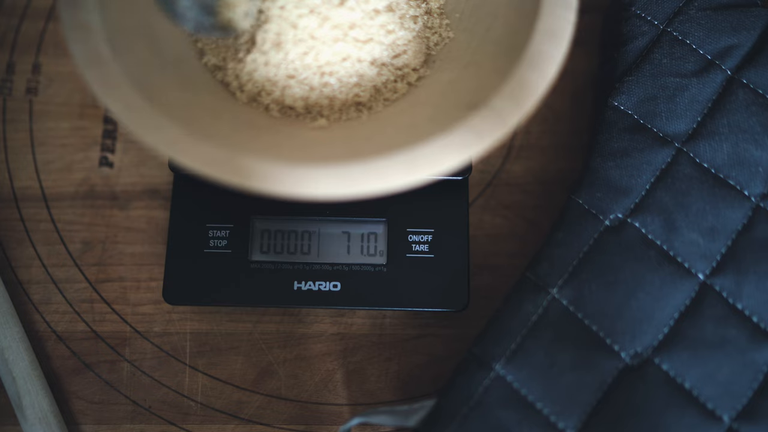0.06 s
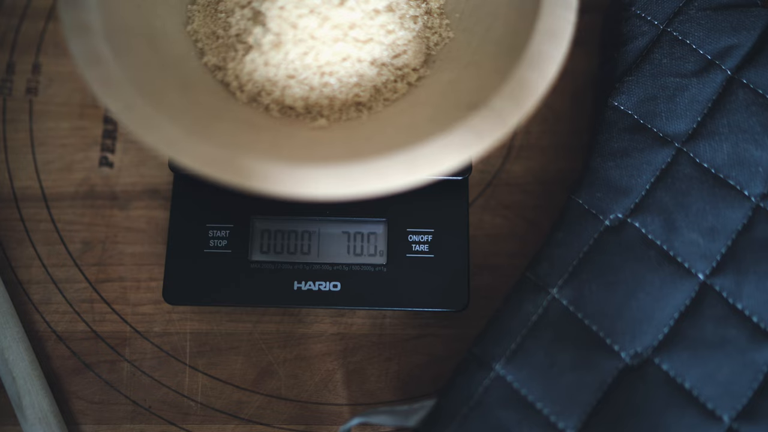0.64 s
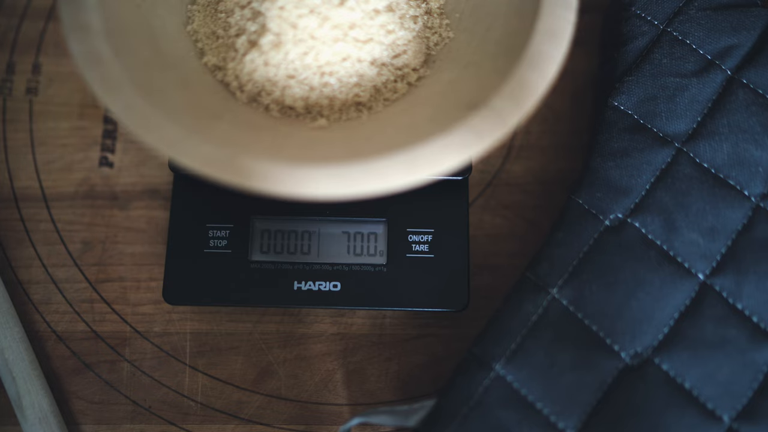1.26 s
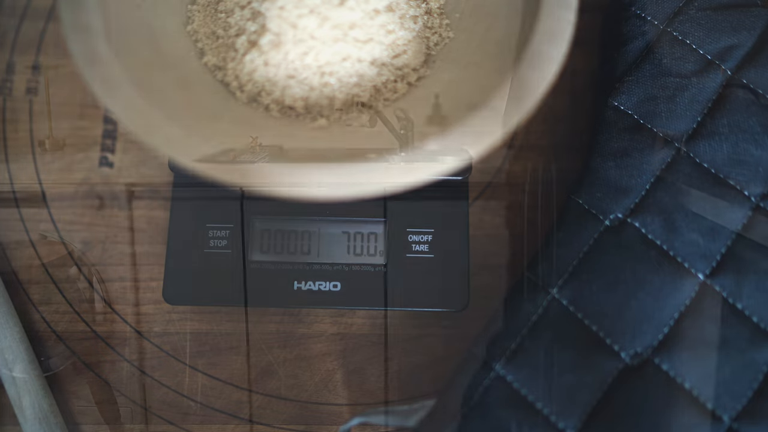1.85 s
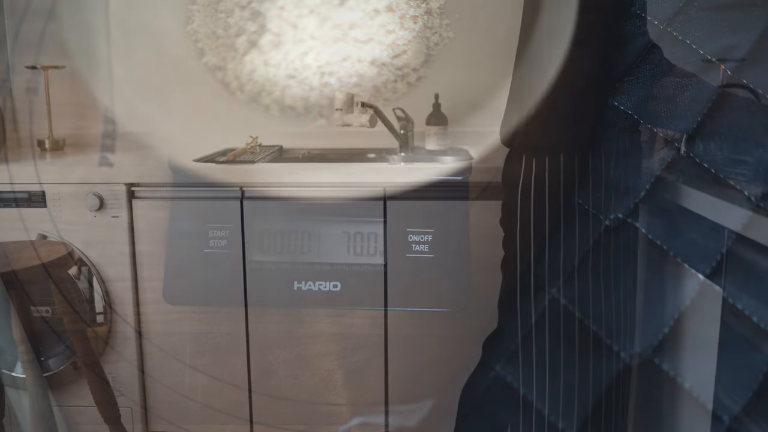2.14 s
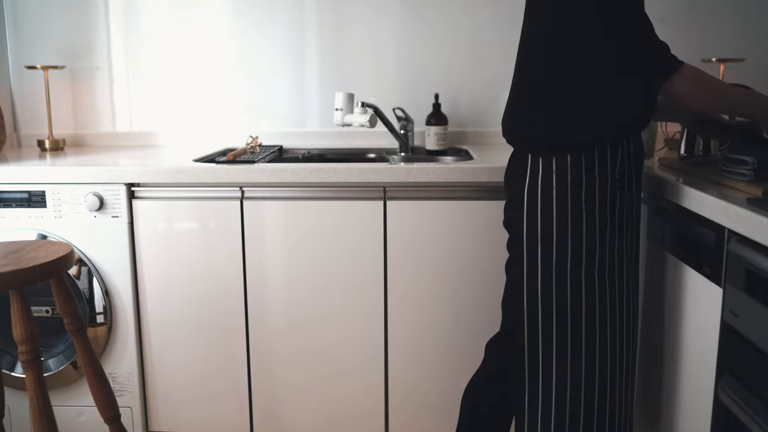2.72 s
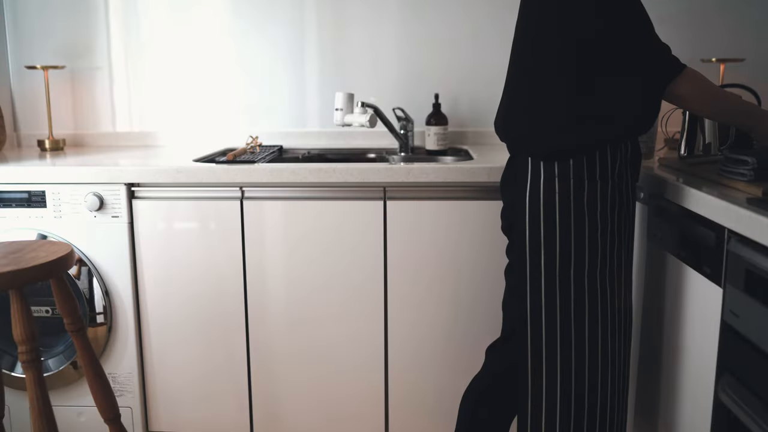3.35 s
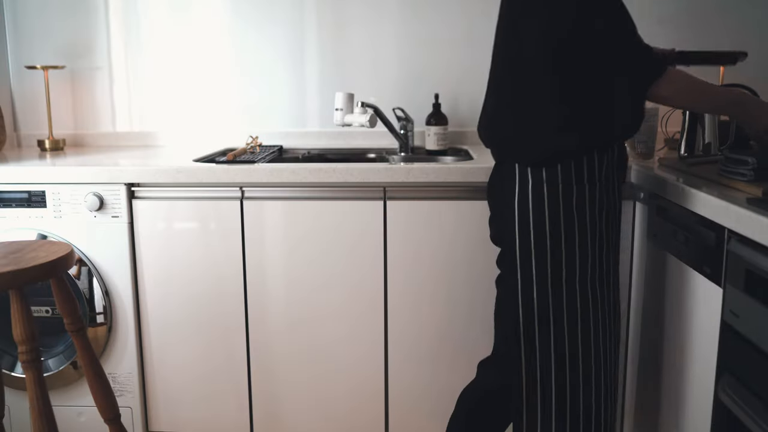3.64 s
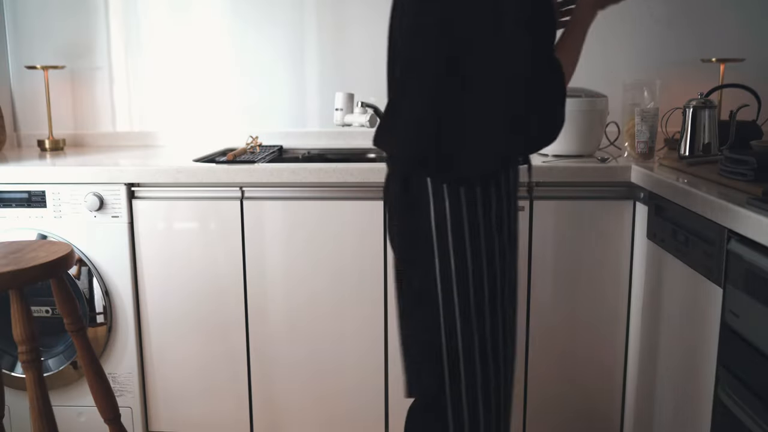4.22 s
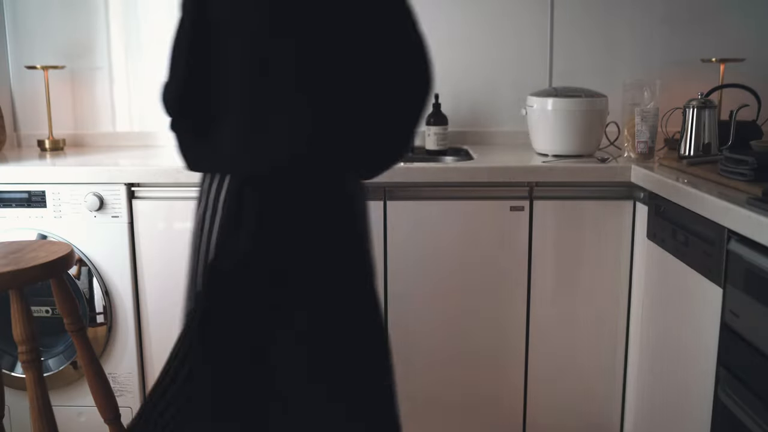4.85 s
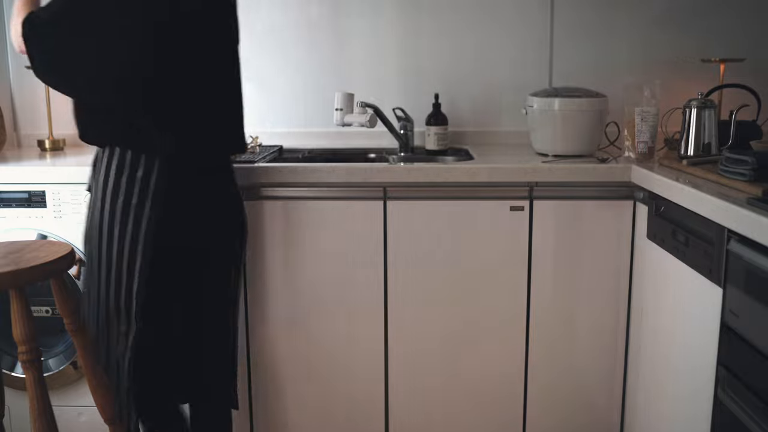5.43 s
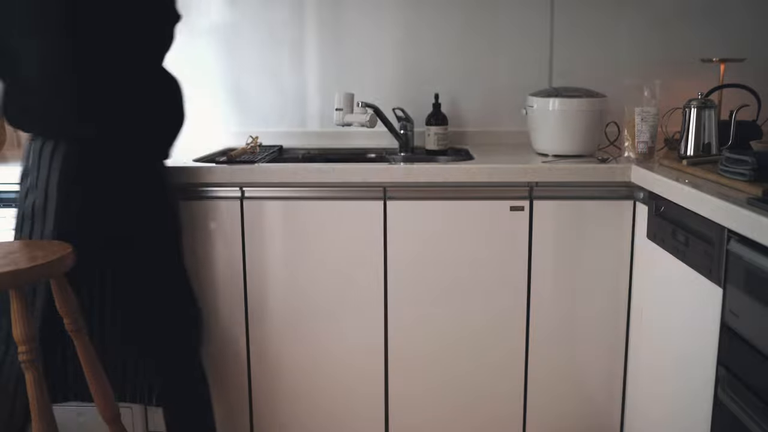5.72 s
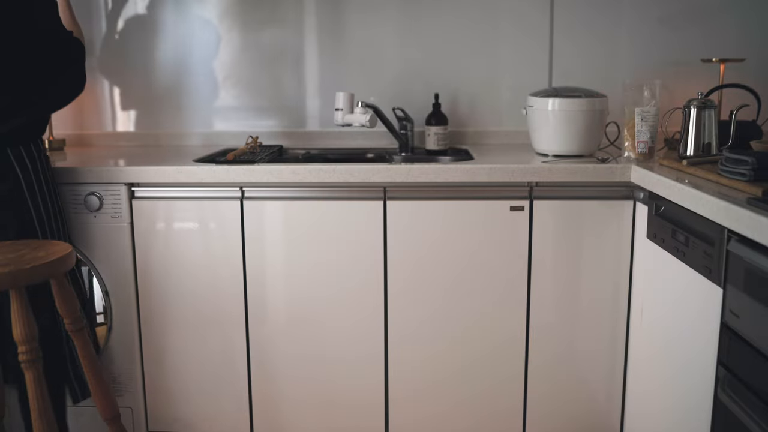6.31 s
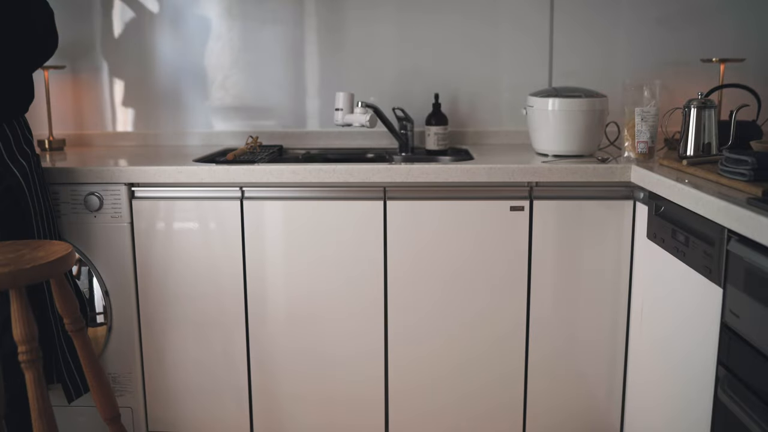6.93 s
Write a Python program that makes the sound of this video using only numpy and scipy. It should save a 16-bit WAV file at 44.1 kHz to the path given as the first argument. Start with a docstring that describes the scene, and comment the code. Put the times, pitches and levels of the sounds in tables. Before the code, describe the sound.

Over a faint kitchen hum, sugar patters, a spoon taps wood, something lands on the worktop, clothes rustle and a door thuds.

```python
"""A faint appliance hum, a low rumble and a dull bump in a small kitchen. A last pinch of sugar patters
into a wooden bowl on a scale, then a spoon knocks on the bowl close by, ringing it and rocking the scale.
Further off something sticks and slips over the worktop and is set down, a tray rubs as it is lifted,
and clothes rustle as the cook crosses the room. Last, after a soft footfall, a door unlatches; its panel
shudders with a low thud and loose fittings rattle."""
import sys
import numpy as np
from scipy import signal
from scipy.fft import rfft, irfft, next_fast_len
from scipy.io import wavfile

SR = 44100
rng = np.random.default_rng(int(sys.argv[2]) if len(sys.argv) > 2 else 0)


def master(y):
    """Save y as 16-bit WAV."""
    cut = np.clip(np.atleast_2d(y).T, -1, 1)
    pcm = np.round(cut * 32767)  # scale
    wavfile.write(sys.argv[1], SR, pcm.astype(np.int16))


N = 311787
TIME_S = np.arange(N) / SR
AGE_S = TIME_S[:SR]  # time since a blow


# Distinct crumbs landing, then two faint strays. Each row: start in seconds, level in dB.
CRUMBS = [(1.394, -64), (1.43, -64.5), (1.4465, -45), (1.4557, -54), (1.4592, -53.5), (1.473, -62),
          (1.496, -66), (1.5024, -61), (1.886, -79), (2.035, -74)]
# Crumb spectrum. Each row: frequency in Hz, gain in dB.
CRUMB_SPECTRUM = [(400, -22), (950, 1.5), (1400, -4), (2100, 4), (3500, -8.5), (6300, 2.5), (9000, -6),
                  (11000, -15.5), (15000, -16), (16500, -40)]

def sugar(tick_t60_s=0.008, echo_t60_s=0.19, echo_db=-7, echo_top_hz=3500):
    """Crumbs tick drily on the wood and the heap; the bowl holds a duller echo for a moment."""
    middle_s, spread_s = 1.466, 0.125
    fine_count, fine_db, scatter_db = 10, -69.5, 3
    fine = []
    for _ in range(fine_count):
        start_s = max(middle_s + spread_s * (rng.random() - 0.5), CRUMBS[0][0])
        fine.append((start_s, fine_db + scatter_db * rng.standard_normal()))
    out = np.zeros(N)
    for start_s, db in CRUMBS + fine:
        echo = burst(cut(crack(echo_t60_s), echo_top_hz, "lowpass", order=1), 0.004)
        landing = burst(crack(tick_t60_s), 0.004)
        add(out, start_s, amp(db) * (landing + amp(echo_db) * echo))
    return colour(out, CRUMB_SPECTRUM)


# Spoon taps. Each row: start in seconds, level in dB, cutoff in Hz, push on the scale in dB,
# push pitch in Hz, echo relative to the direct tap in dB.
SPOON_TAPS = [(2.054, -62, 990, -51, 172, -3), (2.149, -60, 1540, -45, 103, 3),
              (2.1588, -56.5, 1180, -47, 123, -22), (2.251, -42, 980, -42, 207, 2.5),
              (2.272, -39.5, 2540, -51, 193, -4), (2.3005, -39, 13100, -44, 182, -5.5),
              (2.36, -41, 4530, -46.5, 320, -7)]
# Bowl modes. Each row: frequency in Hz, level in dB, T60 in seconds.
BOWL_MODES = [(338, -18.5, 0.1), (518, -8, 0.025), (670, -4, 0.023), (1284, -7, 0.019), (1720, -2, 0.0073),
              (2480, -9.5, 0.021), (3300, -16, 0.015), (5360, -9.5, 0.0054), (6830, -5.5, 0.0035),
              (11500, -12, 0.002), (13810, -16, .005)]
# Spectrum the bowl radiates. Each row: frequency in Hz, gain in dB.
BOWL_SPECTRUM = [(100, -31), (300, 0), (700, 2.5), (1300, -1.5), (2000, -7.5), (3300, -11), (5000, -15),
                 (10000, -22), (16000, -32)]

def spoon(crack_db=-4, crack_t60_s=0.017, push_t60_s=0.036, spot_db=2):
    """Each tap rings the bowl and rocks the scale; a softer contact leaves out the treble."""
    out = np.zeros(N)
    for start_s, db, cutoff_hz, push_db, push_hz, room_db in SPOON_TAPS:
        # the spot struck weights the modes
        modes = [(hz, mode_db + spot_db * rng.standard_normal(), t60) for hz, mode_db, t60 in BOWL_MODES]
        wood = unit(ring(modes)) + amp(crack_db) * unit(colour(crack(crack_t60_s), BOWL_SPECTRUM))
        echo = colour(room(swell_s=0.0018), BOWL_SPECTRUM)
        tap = unit(cut(wood, cutoff_hz, "lowpass")) + amp(room_db) * unit(cut(echo, cutoff_hz, "lowpass"))
        push = ring([(push_hz, 0, push_t60_s)])
        add(out, start_s, amp(db) * burst(tap, 0.013) + amp(push_db) * burst(push, 0.01))
    return out


# Low thuds: a soft footfall, then the door's blow and rebounds.
# Each row: start in seconds, level in dB, push length in seconds.
LOW_THUDS = [(5.882, -61.5, 0.013), (5.924, -68, 0.0038), (6.4619, -45.5, 0.0029), (6.4714, -31, 0.0031),
             (6.513, -40, 0.0013), (6.6494, -38, 0.0019), (6.753, -42.5, 0.0088), (6.8248, -48.5, 0.0037),
             (6.878, -48, 0.002)]
# Door panel modes. Each row: frequency in Hz, level in dB, T60 in seconds.
DOOR_MODES = [(62, -26, 0.61), (73.7, -6, 0.59), (79.4, -3, .23), (106.3, -4.5, 0.53), (187.4, -11, 0.22),
              (338, -21.5, 0.14), (396, -21.5, 0.51)]

def footfall_and_door(room_db=-15, rumble_top_hz=170):
    """Soft pushes set a big panel booming, and the room rumbles with it."""
    out = np.zeros(N)
    panel = ring(DOOR_MODES, neighbour_gain=0.97)
    for start_s, db, length_s in LOW_THUDS:
        push = AGE_S * np.exp(-4 * AGE_S / length_s)
        boom = unit(signal.fftconvolve(push, panel)[:SR])
        rumble = unit(cut(room(swell_s=0.0018), rumble_top_hz, "lowpass", order=3))
        add(out, start_s, amp(db) * burst(boom + amp(room_db) * rumble, 0.05))
    return out


def rattle(full_thud_db=-30.5, body_db=-56, tick_db=-73, lead_s=0.008, stretch_s_per_db=0.05):
    """Loose fittings rattle with each low thud, more weakly and loosely with the softer ones."""
    out = np.zeros(N)
    for start_s, db, _ in LOW_THUDS:
        weaker_db = max(full_thud_db - db, 0)
        length_s = 0.031 + stretch_s_per_db * weaker_db
        body = amp(body_db - 0.89 * weaker_db) * contact(length_s, centre_hz=680, width_oct=2.62)
        edge = amp(tick_db - 1.42 * weaker_db) * tick(length_s=0.021)
        add(out, start_s - lead_s, body + edge)
    return out


# Latch modes. Each row: frequency in Hz, level in dB, T60 in seconds.
LATCH_MODES = [(1160, -0.5, .17), (1620, -1.5, 0.34), (2470, -1, 0.13), (2930, 0, 0.11)]

def latch(start_s=6.423, level_db=-61, rise_s=0.004):
    """The latch springs back and its metal rings briefly."""
    out = np.zeros(N)
    add(out, start_s, amp(level_db) * burst(ring(LATCH_MODES) * rise(rise_s), 0.025))
    return out


# Contacts on the worktop. Each row: start in seconds, level in dB.
LANDINGS = [(3.2143, -44.5), (3.2193, -35.5), (3.2234, -34.5), (3.237, -47)]
# Contact spectrum. Each row: frequency in Hz, gain in dB.
LANDING_SPECTRUM = [(40, -16), (150, -18.5), (250, -10), (330, -4), (430, -15.5), (520, -5), (680, -5.5),
                    (1000, -3), (1400, -14), (1750, -14), (2600, -26.5), (3800, -30.5), (6000, -46),
                    (10000, -56.5), (16000, -74.5)]
# Worktop modes. Each row: frequency in Hz, level in dB, T60 in seconds.
WORKTOP_MODES = [(67, -6, 0.56), (108.7, -27, 0.32), (177.3, -9, 0.55), (342, -1.5, 0.23),
                 (487.5, 1.5, 0.24), (519, 0, 0.36), (654, 10, 0.17), (796, 3, 0.15), (916, 0.5, 0.18),
                 (1084, -13, 0.34), (1105, -25, .22), (1310, -24, 0.3), (1760, -11, 0.36)]

def set_down(ring_db=-38, rise_s=0.0052):
    """Something heavy lands on one edge, then on the rest; the worktop rings on."""
    out = np.zeros(N)
    for start_s, db in LANDINGS:
        thump = colour(blow(t60_s=0.065, room_db=3, swell_s=0.0035), LANDING_SPECTRUM)
        add(out, start_s, amp(db) * burst(thump, 0.014))
    worktop = burst(ring(WORKTOP_MODES) * rise(rise_s), 0.05)
    add(out, LANDINGS[1][0], amp(ring_db) * worktop)
    return out


# Resonances of the slide. Each row: centre in Hz, width in Hz, gain in dB.
SLIDE_RESONANCES = [(576.5, 32, 4), (707, 52, 5), (786, 77, -4), (1270, 52, -3.5), (1405, 35, 0),
                    (1585, 59, -8.5), (2340, 190, -22)]

def slide(peak_s=2.55, force_db=-45.5, rise_db_per_s=186.5, fall_db_per_s=209, direct_gain=0.87, room_db=-5):
    """One shove over the worktop gathers force and stops; stick and slip excite hollow resonances."""
    slips = grains(spread_db=3) * amp(2 * walk(70))
    body = sum(amp(db) * cut(slips, [hz - width_hz / 2, hz + width_hz / 2], "bandpass", order=1)
               for hz, width_hz, db in SLIDE_RESONANCES)
    body = cut(body, 490, "highpass", order=4)
    body = cut(body, 2000, "lowpass", order=4)
    drop_db = np.maximum(rise_db_per_s * (peak_s - TIME_S), fall_db_per_s * (TIME_S - peak_s))
    scrape = unit(body) * amp(force_db - drop_db)
    echo = signal.fftconvolve(scrape, room(swell_s=0.0016) / np.sqrt(SR))[:N]
    return direct_gain * scrape + amp(room_db) * echo


# Tray drawn off its stack. Each row: time in seconds, resonance in Hz, level in dB.
TRAY_PATH = [(3.91, 551, -83), (3.95, 620, -67.5), (3.99, 902, -72), (4.03, 1450, -72), (4.07, 1598, -76.5),
             (4.13, 1600, -83)]

def tray(width_hz=280, hiss_db=-6, judder_db=2):
    """The gap under a sliding tray closes, so its rubbing sound climbs in pitch."""
    hz, db = curves(TRAY_PATH)
    rub = unit(cut(grains(spread_db=2.5), width_hz / 2, "lowpass", order=1))
    hollow = np.sqrt(2) * rub * np.sin(2 * np.pi * np.cumsum(hz) / SR)
    hiss = unit(cut(grains(spread_db=1.9), [450, 2000], "bandpass"))
    moving = (TIME_S > TRAY_PATH[0][0]) & (TIME_S < TRAY_PATH[-1][0])
    envelope = amp(db + judder_db * walk(70)) * moving
    return cut((hollow + amp(hiss_db) * hiss) * envelope, 2100, "lowpass", order=3)


# Bumps and footfalls. Each row: start in seconds, level in dB, pitch in Hz, length in seconds.
BUMPS = [(0.616, -64, 292, 0.029), (2.689, -60, 463, 0.044), (3.554, -61.5, 233, .11),
         (4.693, -68, 540, 0.12), (5.906, -73, 253, 0.052), (6.157, -59.5, 372, 0.039)]
# Hard clicks. Each row: start in seconds, level in dB, pitch in Hz, length in seconds, tick in dB.
CLICKS = [(1.646, -73, 870, .02, -99), (2.736, -60.5, 900, 0.026, -81.5), (3.849, -67, 1100, 0.022, -88),
          (4.87, -71.5, 1620, 0.004, -77.5), (5.34, -63, 850, 0.018, -76), (6.06, -70, 1960, 0.13, -88.5),
          (6.114, -63.5, 1086, 0.16, -87), (6.424, -58, 1750, 0.13, -83.5), (6.599, -69.5, 1500, 0.12, -91),
          (6.888, -74.5, 1840, 0.19, -88.5)]

def knocks(tick_share=0.51):
    """Soft contacts bump dully; hard ones click with a bright tick."""
    out = np.zeros(N)
    for start_s, db, hz, length_s in BUMPS:
        add(out, start_s, amp(db) * contact(length_s, hz, width_oct=1.7))
    for start_s, db, hz, length_s, tick_db in CLICKS:
        body = amp(db) * contact(length_s, hz, width_oct=1.55)
        add(out, start_s, body + amp(tick_db) * tick(tick_share * length_s))
    return out


# Modes of the kitchen's hard fittings. Each row: frequency in Hz, level in dB, T60 in seconds.
FITTING_MODES = [(324, 6.5, 0.49), (627, 2, 0.21), (930, -3, 0.068), (1160, -8.5, 0.26), (1612, -8.5, 0.12),
                 (2844, 4, 0.06), (3050, -6, 0.11), (3470, -10, .12), (7450, -6.5, 0.03)]

def contact(length_s, centre_hz, width_oct, ring_db=-6, detune=0.025, spot_db=3):
    """A light contact across the room: a thump, its echo and a short ring that varies with the spot."""
    modes = [(hz * (1 + detune * rng.standard_normal()), db + spot_db * rng.standard_normal(), t60)
             for hz, db, t60 in FITTING_MODES]
    low_hz, high_hz = centre_hz * 2 ** (-width_oct / 2), centre_hz * 2 ** (width_oct / 2)
    parts = blow(length_s, room_db=0, swell_s=0.12 * length_s), ring(modes)
    thump, ringing = (unit(cut(cut(x, low_hz, "highpass"), high_hz, "lowpass", order=4)) for x in parts)
    return burst((thump + amp(ring_db) * ringing) * rise(0.06 * length_s), 0.025)


def tick(length_s, band_hz=(4660, 9850), echo_t60_s=0.27, echo_db=4, swell_s=0.002):
    """The bright edge of a hard contact, with its short echo."""
    echo = burst(crack(echo_t60_s) * rise(swell_s), 0.5)
    direct = burst(crack(length_s), 1)
    return burst(cut(direct + amp(echo_db) * echo, band_hz, "bandpass", order=3), 0.025)


# Cloth movements. Each row: middle in seconds, length in seconds, swish in dB, rustle in dB.
CLOTH_MOVES = [(1.902, 0.14, -72, -87.5), (2.09, .11, -72.5, -86), (2.597, 0.15, -68, -81),
               (2.748, .1, -69, -90), (3.724, 0.24, -76, -92.5), (4.008, 0.18, -71, -81.5),
               (4.416, 0.17, -76, -83.5), (4.708, 0.12, -73.5, -86.5), (4.984, 0.18, -70, -85),
               (5.23, 0.42, -71.5, -85), (5.492, 0.1, -67, -89), (5.988, .1, -75.5, -99)]
# Swish and rustle spectra. Each row: frequency in Hz, gain in dB.
SWISH_SPECTRUM = [(250, 7), (600, -2), (1500, -3), (3000, -11.5), (5000, -32), (9000, -37.5)]
RUSTLE_SPECTRUM = [(1500, -6), (3500, 1.5), (7000, -2.5), (12000, -5), (15000, -11.5), (16500, -27)]

def clothes(trim_db=-1):
    """With each movement the cloth swells into a swish and crackles finely."""
    swish_power, rustle_power = np.zeros(N), np.zeros(N)
    for middle_s, length_s, swish_db, rustle_db in CLOTH_MOVES:
        speed = 1 / (1 + (2 * (TIME_S - middle_s) / length_s) ** 2) ** 2
        swish_power += speed * amp(swish_db) ** 2
        rustle_power += speed * amp(rustle_db) ** 2
    swish = unit(colour(grains(spread_db=3.44), SWISH_SPECTRUM)) * np.sqrt(swish_power)
    swish *= amp(0.51 * walk(29))
    rustle = unit(colour(grains(spread_db=4.3), RUSTLE_SPECTRUM)) * np.sqrt(rustle_power)
    rustle *= amp(walk(40) + 2.3 * walk(450))
    return amp(trim_db) * (swish + rustle)


# Room tone by the scale (near) and of the whole kitchen (far). Each row: frequency in Hz, gain in dB.
NEAR_SPECTRUM = [(12, -13), (30, -4.5), (50, -7.5), (80, -19), (130, -24), (240, -17.5), (300, -25),
                 (370, -30), (500, -35.5), (765, -37.5), (1500, -46), (3000, -57), (5000, -63.5),
                 (16000, -70)]
FAR_SPECTRUM = [(11, -23), (18, -2), (42, -2.5), (114, -9.5), (139, -31.5), (175, -8), (213, -34.5),
                (268, -24), (387, -25.5), (446, -25.5), (610, -33), (1210, -36.5), (1390, -39),
                (12700, -66), (16000, -66.5)]
# Deep rumble by the scale. Each row: time in seconds, level in dB.
RUMBLE_LEVELS = [(0.0, -55.5), (0.47, -51.5), (0.63, -71.5), (0.73, -48.5), (1.51, -49.5), (1.59, -62.5),
                 (2.63, -54.5), (2.85, -66.5)]

def room_tone(near_db=-60, near_end_s=2.85, far_db=-61, far_full_s=2.6, crossfade_s=0.52):
    """Near noise, hum and rumble give way to the far tone, which later sinks and creeps back."""
    lull_s, fall_s, depth_db, recovery_db_per_s = 5.475, 0.34, -7.5, 3
    lull_db = depth_db * ramp(lull_s, fall_s) + recovery_db_per_s * np.maximum(TIME_S - lull_s - fall_s, 0)
    near_fade = np.sqrt(1 - ramp(near_end_s - crossfade_s, crossfade_s))
    near_gain = amp(near_db) * near_fade
    far_gain = amp(far_db + lull_db) * ramp(far_full_s - crossfade_s, crossfade_s)
    near = unit(colour(rng.standard_normal(N), NEAR_SPECTRUM)) * near_gain
    far = unit(colour(rng.standard_normal(N), FAR_SPECTRUM)) * far_gain
    rumble = unit(cut(rng.standard_normal(N), [12, 21], "bandpass", order=3))
    rumble *= amp(curves(RUMBLE_LEVELS)[0]) * near_fade
    return near + far + rumble + appliance_hum(near_gain, far_gain)


# Hum tones. Each row: frequency in Hz, level in dB relative to the near room tone, then to the far one.
HUM_TONES = [(112.9, -38.5, -15), (190.7, -26.5, -20.5), (231.4, -16, -36.5), (270.5, -21.5, -22.5),
             (363, -19.5, -26), (5712, -47.5, -70.5)]

def appliance_hum(near_gain, far_gain):
    """An appliance hums in tones that waver in phase and level."""
    out = np.zeros(N)
    for hz, near_db, far_db in HUM_TONES:
        tone = np.sqrt(2) * np.sin(2 * np.pi * hz * TIME_S + 0.5 * walk(6.9)) * amp(2 * walk(3.4))
        out += tone * (near_gain * amp(near_db) + far_gain * amp(far_db))
    return out


# Thin high tones. Each row: frequency in Hz, level in dB.
THIN_TONES = [(9367, -88.5), (13404, -93), (15224, -99)]

def thin_ring(middle_s=1.32, width_s=0.027):
    """A faint high ring swells and fades just before the sugar falls."""
    swell = np.exp(-((TIME_S - middle_s) / width_s) ** 2)
    tones = sum(amp(db) * np.sin(2 * np.pi * hz * TIME_S + walk(120)) for hz, db in THIN_TONES)
    return np.sqrt(2) * swell * tones


# Kitchen reverberation. Each row: frequency in Hz, T60 in seconds.
ROOM_DECAY = [(100, .55), (500, 0.44), (1400, 0.4), (3700, 0.44), (10000, 0.29), (16000, 0.3)]

def room(swell_s):
    """Diffuse echo of one blow, building up over swell_s; the treble dies first."""
    edges_hz = np.geomspace(60, 18000, 7)
    hz, t60_s = np.transpose(ROOM_DECAY)
    tail = sum(cut(crack(np.interp(np.sqrt(low * high), hz, t60_s)), [low, high], "bandpass")
               for low, high in zip(edges_hz, edges_hz[1:]))
    return burst(tail * rise(swell_s), 0.38)


def blow(t60_s, room_db, swell_s):
    """A rough contact and its echo."""
    return burst(crack(t60_s), 1) + amp(room_db) * room(swell_s)


def crack(t60_s):
    """Dying noise of a rough contact."""
    return rng.standard_normal(SR) * decay(t60_s)


def ring(modes, neighbour_gain=-1):
    """Struck modes; at a gain of -1 neighbours swing against each other."""
    return sum(neighbour_gain ** k * amp(db) * decay(t60_s) * np.sin(2 * np.pi * hz * AGE_S)
               for k, (hz, db, t60_s) in enumerate(modes))


def grains(spread_db):
    """Dense tiny slips of uneven size."""
    return unit(rng.standard_normal(N) * amp(spread_db * np.minimum(rng.exponential(size=N), 4)))


def walk(rate_hz):
    """Random drift with a spread near 1."""
    return np.interp(TIME_S * rate_hz, np.arange(4096), rng.standard_normal(4096))


def decay(t60_s):
    """Exponential fall, 60 dB in t60_s."""
    return np.exp(-np.minimum(np.log(1000) * AGE_S / t60_s, 40))


def rise(tau_s):
    """Exponential approach from 0 to 1."""
    return 1 - np.exp(-AGE_S / tau_s)


def ramp(start_s, length_s):
    """Straight line from 0 to 1."""
    return np.clip((TIME_S - start_s) / length_s, 0, 1)


def curves(table):
    """Each column of a timed table, sample by sample."""
    times_s, *columns = np.transpose(table)
    return [np.interp(TIME_S, times_s, column) for column in columns]


def cut(x, hz, kind, order=2):
    """Butterworth filter."""
    return signal.sosfilt(signal.butter(order, hz, kind, fs=SR, output="sos"), x + 1e-18)


def colour(x, spectrum):
    """Minimum-phase filter with a (Hz, dB) spectrum."""
    size = 2 * next_fast_len(len(x) // 2 + 16384, real=True)
    hz, db = np.transpose(spectrum)
    bins_hz = np.fft.rfftfreq(size, 1 / SR)
    log_gain = np.log(amp(np.interp(np.log(bins_hz + 1), np.log(hz), db)))
    cepstrum = irfft(log_gain)[:size // 2]
    cepstrum[1:] *= 2
    return irfft(rfft(x, size) * np.exp(rfft(cepstrum, size)))[:len(x)]


def amp(db):
    """Decibels to gain."""
    return 10 ** (np.asarray(db) / 20)


def unit(x):
    """Scale to rms 1."""
    return x / np.sqrt(np.mean(x ** 2))


def burst(x, span_s):
    """Scale to the energy of span_s at rms 1."""
    return x / np.sqrt(np.sum(x ** 2) / (span_s * SR))


def add(out, start_s, x):
    """Mix x into out from start_s."""
    i = int(start_s * SR)
    out[i:i + len(x)] += x[:N - i]


def scene():
    """All sources at one microphone."""
    cook = sugar() + spoon() + knocks() + set_down() + slide() + tray() + clothes()
    doorway = latch() + footfall_and_door() + rattle()
    return (cook + doorway + room_tone() + thin_ring())[None]


# Microphone response. Each row: frequency in Hz, gain in dB.
MIC_RESPONSE = [(20, 0), (60, 0.5), (2200, -1), (3300, 0.5), (4700, -1), (6300, -0.5), (8000, 1),
                (16000, 1)]

def record(dry):
    """The microphone slightly hollows the lower treble; a steep low-pass cuts the top."""
    top_hz = 16000
    lowpass = signal.ellip(8, 0.2, 70, top_hz, fs=SR, output="sos")
    return signal.sosfilt(lowpass, colour(dry[0], MIC_RESPONSE))[None]


dry = scene()
out = record(dry)
master(out)
```